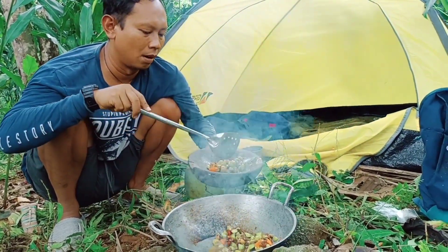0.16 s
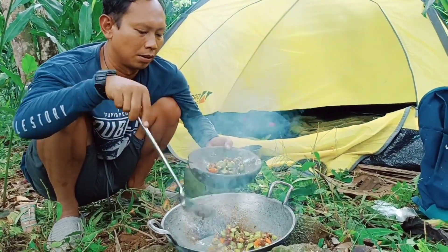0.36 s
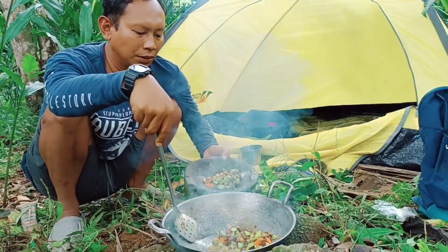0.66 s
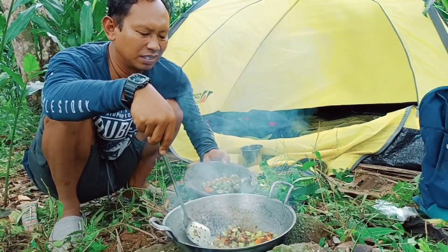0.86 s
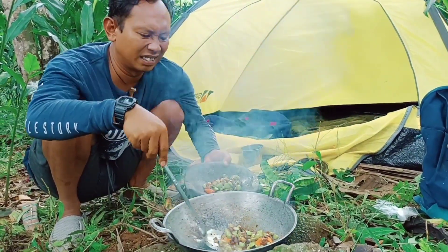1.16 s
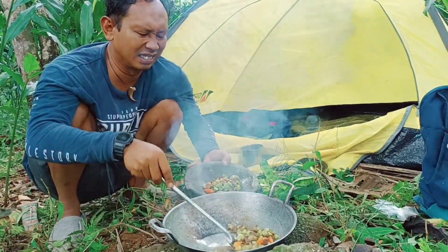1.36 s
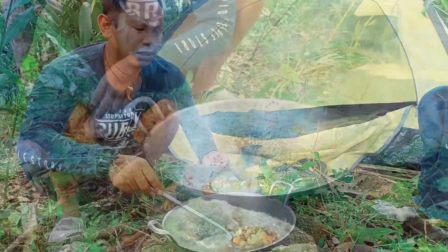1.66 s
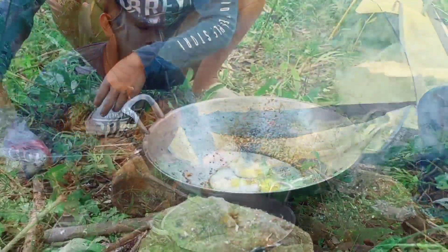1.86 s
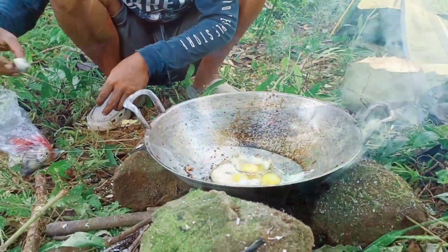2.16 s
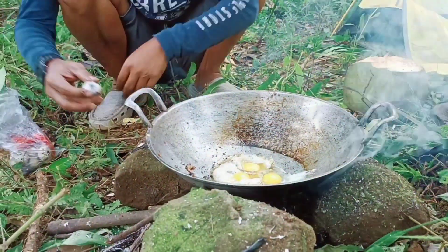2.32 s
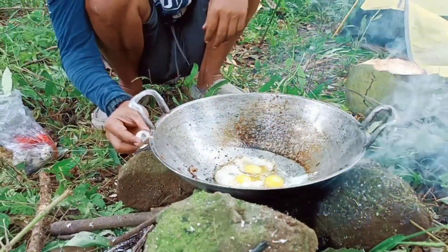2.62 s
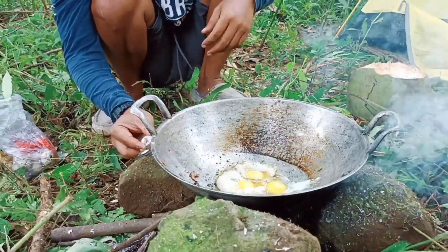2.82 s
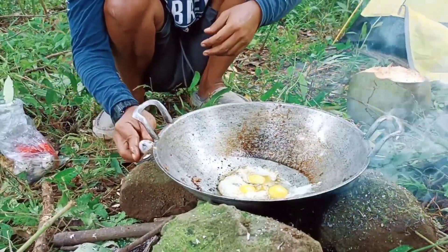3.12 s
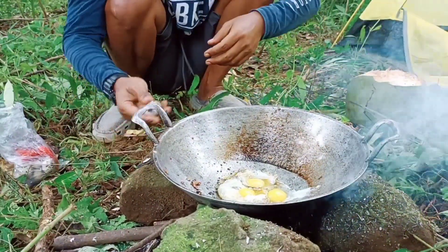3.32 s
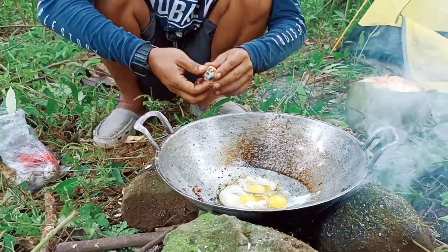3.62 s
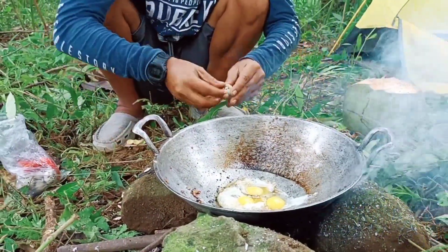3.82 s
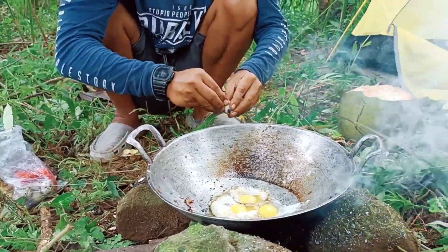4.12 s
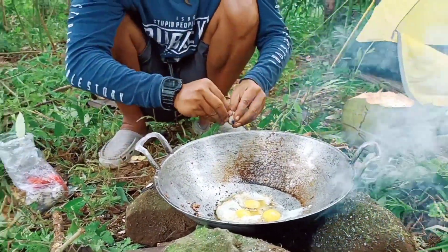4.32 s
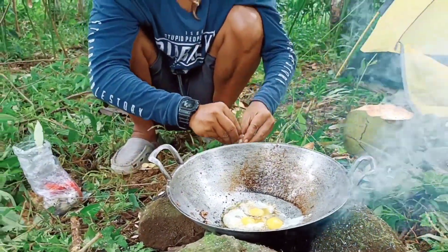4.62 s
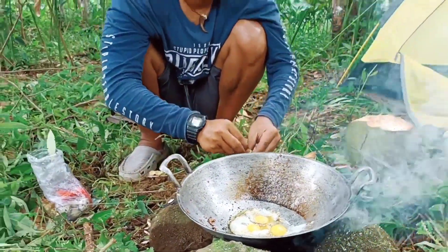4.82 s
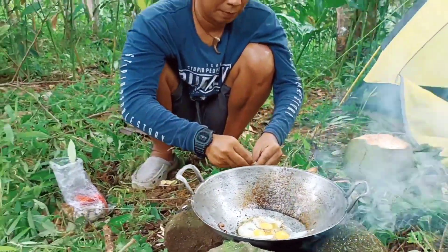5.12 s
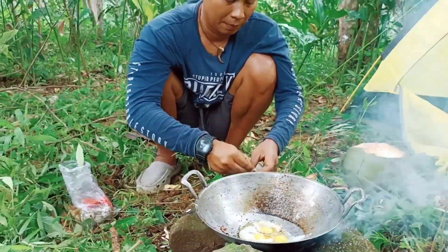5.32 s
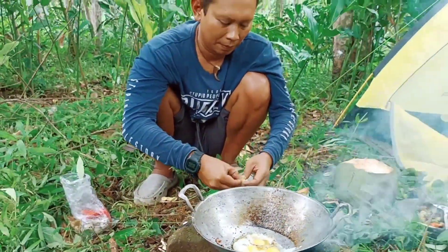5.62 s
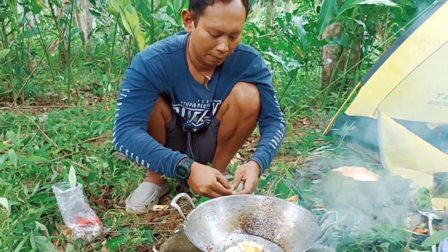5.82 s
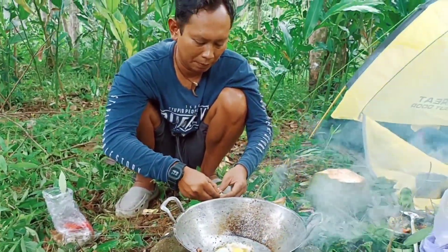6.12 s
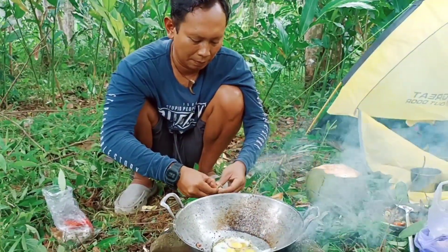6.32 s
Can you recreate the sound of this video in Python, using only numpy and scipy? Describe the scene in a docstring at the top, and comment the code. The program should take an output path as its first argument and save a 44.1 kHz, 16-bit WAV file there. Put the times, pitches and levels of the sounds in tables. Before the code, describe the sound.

In a leafy forest clearing, a spatula rattles brightly against a wok and drags in short gritty strokes within the first second and a half. The sound then changes to a fluttering, low-pitched wood fire under spitting eggs, with little taps and scattered snaps. Cicadas waver behind, and a bird sings two runs of climbing whistles with woodland echoes. Mono, close and detailed, ending on a loud crack.

```python
"""A metal spatula clanks into a wok and scrapes: ringing steel modes, contact noise and stick-slip crackle.
Oil sizzles as dense random bursts and spits as short swelling noise droplets.
Under the wok a wood fire roars, puffs at low pitch, snaps and knocks; an egg taps the wok's low modes.
Behind: two wavering bands of cicada buzz, a bird's whistled rising notes with forest echoes, a faint rumble."""
import sys
import numpy as np
from scipy import signal
from scipy.fft import rfft, irfft, next_fast_len
from scipy.io import wavfile
from scipy.ndimage import map_coordinates

SR = 44100
rng = np.random.default_rng(int(sys.argv[2]) if len(sys.argv) > 2 else 0)


def master(y):
    """Save y as 16-bit WAV."""
    cut = np.clip(np.atleast_2d(y).T, -1, 1)
    pcm = np.round(cut * 32767)  # scale
    wavfile.write(sys.argv[1], SR, pcm.astype(np.int16))


N = 285327

# Levels in dB are before the trims in each function. Spectra give relative dB per Hz.
# Rumble of air at the microphone: time_s, level_db
BREEZE_LEVEL = [(0, -66), (1.6, -61), (2.3, -68), (5.5, -65), (6.47, -61)]
# Cicadas: time_s, low_band_db, high_band_db
CICADA_LEVELS = [(0, -60, -52.5), (.6, -51.5, -66), (1.1, -53, -60), (1.45, -56, -49), (2.2, -75, -62),
                 (3.3, -55.5, -76), (3.9, -64, -57), (4.7, -60, -82), (6.47, -61, -58)]
# Runs of rising notes: first_s, last_s, gap_s, first_pitch_hz, climb_over_run_hz, level_db
SONG_RUNS = [(2.213, 3.171, .24, 2510, 469.4, -46), (4.996, 6.214, .245, 2437, 518, -42.5)]
# Held whistles: start_s, length_s, pitch_hz, scoop_from_below_hz, level_db
HELD_WHISTLES = [(1.391, 0.29, 2945, 380, -41.5), (1.695, 0.088, 2964, 27, -37),
                 (1.78, .22, 2690, 8.5, -50.5), (1.9, 0.099, 2990, 24, -47), (3.27, 0.2, 2345, 10, -61),
                 (3.639, 0.21, 2950, 70, -59), (3.818, 0.16, 2720, 24, -54.5)]
# Steady fire roar: time_s, level_db
FIRE_LEVEL = [(0, -56), (1, -53), (1.7, -58), (2.2, -52.5), (2.8, -47.5), (3.4, -45.5), (4.1, -48),
              (5.5, -51.5), (5.85, -46.5), (6.47, -50)]
# Roar spectrum: freq_hz, relative_db
ROAR_SPECTRUM = [(60, -26), (85, 7), (120, 9), (150, 9.5), (210, 1), (300, -6.5), (500, -46), (800, -56)]
# Spells of even, low puffing: first_s, last_s, gap_s, first_db, last_db
PUFF_SPELLS = [(1.868, 2.463, .119, -45, -33), (2.567, 2.684, .059, -33, -34),
               (2.805, 3.053, .124, -29.5, -34), (3.118, 3.692, .064, -29, -30.5),
               (3.819, 4.327, .127, -31.5, -30), (4.385, 4.747, .072, -33, -34.5),
               (4.821, 5.125, .076, -32, -33), (5.194, 5.494, .1, -36, -45),
               (5.595, 5.855, .087, -35, -31.5), (5.931, 6.47, .077, -31, -31.5)]
# Sharp snaps of wood, oil and steel: start_s, level_db, body_re_crack_db, crack_tilt_db_per_octave
SNAP_EVENTS = [(0.2221, -11, -16.5, 7), (.598, -27.5, -6, 5), (.857, -6, -7, -7), (2.742, -21.5, -10, -1),
               (2.757, -24, -22, 3), (3.002, -32.5, -0.5, 10), (3.112, -30.5, -22, 6),
               (3.993, -25.5, -17, 1), (4.297, -32, -24, 9), (5.7015, -16, -27, -1), (5.946, -28.5, -3, 2),
               (6.129, -26.5, -22, 9), (6.3436, -7.5, -3.5, 0)]
# Crack spectrum before tilt: freq_hz, relative_db
CRACK_SPECTRUM = [(1500, -30), (3500, -13), (5700, -16), (7800, -18.5), (9400, 0.5), (10500, -10.5),
                  (12500, -19), (15400, -31), (16500, -35)]
# Snap body spectrum: freq_hz, relative_db
BODY_SPECTRUM = [(40, -75), (100, -54), (220, 1), (400, 11), (650, -8), (1100, -9), (1900, 3.5),
                 (3000, -12.5), (5000, -58), (8000, -44)]
# Dull knocks of sticks and shell: time_s, level_db, resonance_hz
KNOCK_EVENTS = [(2.022, -40, 503), (2.083, -38, 557), (2.181, -41.5, 1000), (2.601, -23.5, 1600),
                (2.737, -34, 1930), (5.194, -38, 804), (5.888, -32, 2180), (6.299, -29, 2400),
                (6.3215, -13.5, 1700), (6.3534, -16.5, 2020)]
# Soft egg chatter on the rim: first_s, last_s, gap_s, first_db, last_db
EGG_CHATTERS = [(2.51, 2.58, .035, -42, -48.5), (2.753, 2.85, .032, -45, -35),
                (3.028, 3.143, .038, -29.5, -41.5)]
# Low wok modes under a soft touch: mode_hz, relative_db, t60_s
LOW_MODES = [(400.5, -3, 0.15), (518.6, 4.5, 0.17), (556.6, 3.5, 0.15), (741, -2.5, 0.15),
             (788, -2.5, 0.15), (876, -15, 0.29), (1059, -4, 0.21), (1296, -11, 0.29)]
# Frying: time_s, simmer_db, fizz_db
FRYING_LEVELS = [(0, -51.5, -48.5), (.4, -55, -50.5), (1.25, -56, -44.5), (2.2, -56, -59),
                 (3.2, -53.5, -55.5), (4.55, -51.5, -55.5), (4.85, -53.5, -57.5), (6.15, -55, -57.5),
                 (6.47, -42, -51)]
# Simmer spectrum: freq_hz, relative_db
SIMMER_SPECTRUM = [(180, -18), (300, 2), (785, -2), (864, -5), (1080, 0.5), (1440, -2.5), (1770, -0.5),
                   (2290, -2), (2860, 0), (3140, -4.5), (5300, -12.5), (6600, -18.5), (8000, -20),
                   (10400, -13), (17600, -120)]
# Fine fizz spectrum: freq_hz, relative_db
FIZZ_SPECTRUM = [(3820, -11), (6500, -27), (6930, -38.5), (7640, -16), (8890, 2.5), (9690, 6),
                 (11000, -10.5), (11800, -8), (12800, -10), (14800, -13.5), (16000, -24)]
# Water flashing to steam in the oil: start_s, length_s, level_db
STEAM_FLARES = [(3.93, .08, -49.5), (4.175, 0.034, -39.5), (4.36, 0.4, -42), (4.44, .04, -45.5),
                (4.715, 0.024, -43)]
# Steam spectrum: freq_hz, relative_db
STEAM_SPECTRUM = [(150, -35), (350, -5.5), (600, 0.5), (1100, -5.5), (1800, -0.5), (2700, 1), (3500, -5.5),
                  (5000, -8), (7500, -15.5), (9500, -0.5), (12000, -9), (15500, -18), (17000, -40)]
# Loudest droplets bursting in the oil: start_s, peak_db, pitch_hz
LOUD_SPITS = [(1.588, -32, 4420), (2.279, -37.5, 3250), (2.552, -30, 6550), (2.866, -24, 3330),
              (2.898, -31.5, 4300), (3.166, -30.5, 5030), (3.249, -29, 3380), (3.262, -22.5, 3480),
              (3.328, -27.5, 9100), (3.405, -29, 9100), (3.642, -32, 6100), (3.679, -18.5, 3980),
              (4.083, -32.5, 4870), (4.272, -37.5, 3340), (4.365, -28, 3380), (5.071, -27.5, 9100),
              (5.16, -32, 6030), (5.311, -31.5, 5860)]
# Faint droplets: time_s, level_db
FAINT_SPIT_LEVEL = [(0, -48.5), (2.5, -45), (3.4, -43.5), (4.1, -42.5), (4.7, -50), (5.5, -53.5),
                    (6.47, -43.5)]
# Spatula blows: start_s, level_db, tilt_db_per_octave, base_t60_s
CLANK_BLOWS = [(.857, -17.5, 4.5, 0.2), (.872, -22.5, -7, 0.23), (.910, -19.5, -2.5, 0.092),
               (0.9401, -17.5, 0, 0.098)]
# Wok modes under a hard blow: mode_hz, relative_db, t60_ratio to the blow's base
WOK_MODES = [(424, -1.5, 1.2), (498, -2.5, 1), (545, 3.5, 1), (586, -6, .8), (690, -4, 1), (820, 4.5, 1),
             (908, -3, 1), (1090, 8, 1), (1250, -20, .8), (1400, -3, .7), (1544, 7.5, .8), (1630, -21, 1),
             (1706, 3.5, 1), (1880, -15, .6), (2100, -2, 1), (2240, -19, .8), (2470, -0.5, 1),
             (2465, -9, 1), (2730, 1.5, 2.2), (2830, -7, 2.1), (3090, -9, .8), (3210, 1.5, .9),
             (3310, -7, .8), (3720, -1.5, .9), (3736, -6.5, .8), (4300, -13, 1)]
# Contact noise spectrum before tilt: freq_hz, relative_db
CONTACT_SPECTRUM = [(88, -61), (150, -29), (534, -3), (624, -6), (1060, -8.5), (1260, -7.5), (1530, -5),
                    (3220, -15), (3490, -38), (3770, -14), (5910, -34.5), (9440, -31), (16000, -73)]
# Spatula pushed over the steel: start_s, length_s, scrape_db, groan_db
SCRAPE_STROKES = [(0.578, 0.24, -48.5, -64), (1.081, 0.025, -45, -45), (1.119, 0.16, -40, -61),
                  (1.276, 0.064, -32.5, -53.5), (1.316, 0.016, -40, -62), (1.368, 0.031, -35, -51),
                  (1.406, 0.022, -62, -46.5)]
# Scrape spectrum: freq_hz, relative_db
SCRAPE_SPECTRUM = [(300, -11), (420, -10), (520, -4), (850, 4), (1200, -6), (1900, -1), (2700, -0.5),
                   (3400, -3.5), (4250, 1), (5500, -10), (7000, -12), (9500, 6.5), (12500, -8.5),
                   (16000, -24)]

TOP_HZ = 15700
NOTE_S, NOTE_RISE_HZ, CLIMB_POWER = .115, 308.8, 1.6
SONG_ARCH_DB, SONG_FADE_DB = 3, 0.5  # dip at both ends of a run; extra drop by its end
SCOOP_S = 0.054  # time constant
PUFF_HALF_S = 0.013  # median half-length
FLARE_ATTACK_S, FLARE_T60_S = 0.031, 0.076
WET_FROM_S, WET_TO_S = 2.4, 5.45  # lesser spits while the eggs are wet
LESSER_DB, LESSER_SPREAD_DB, LESSER_LOW_HZ, LESSER_HIGH_HZ = -31.5, 9, 3400, 9200
SPIT_LIFE_S, SPIT_WIDTH_RATIO = 0.0031, .12  # time to swell; bandwidth / pitch
SPRAY_S = .014  # longest spray delay
STROKE_ATTACK_S, STROKE_T60_S = 0.023, 0.13


def amp(db):
    """Decibels to gain."""
    return 10 ** (np.asarray(db) / 20)


def unit(x):
    """Scaled to rms 1."""
    return x / np.sqrt(np.mean(x ** 2) + 1e-20)


def seconds(length_s):
    """Time axis."""
    return np.arange(int(length_s * SR)) / SR


def fade(t, t60_s):
    """Exponential decay, 60 dB down after t60_s."""
    return np.exp(-np.log(1000) * t / t60_s)


def curves(rows):
    """One value per sample for each column after the time."""
    time_s, *columns = np.transpose(rows)
    return [np.interp(np.arange(N) / SR, time_s, column) for column in columns]


def wobble(rate_hz):
    """Smooth random curve, rate_hz knots a second."""
    knots = rng.standard_normal(int(N * rate_hz / SR) + 4)
    return map_coordinates(knots, [np.arange(N) * rate_hz / SR])


def filtered(x, response):
    """Spectrum of x times a response of frequency."""
    size = next_fast_len(len(x) + 8192)
    return irfft(rfft(x, size) * response(np.fft.rfftfreq(size, 1 / SR)), size)[:len(x)]


def coloured(x, spectrum):
    """x shaped by (freq_hz, relative_db) points, at rms 1."""
    freq_hz, db = np.transpose(spectrum)
    return unit(filtered(x, lambda hz: amp(np.interp(np.log(hz + 1), np.log(freq_hz), db))))


def noise(spectrum, size=N):
    """Coloured noise of rms 1."""
    return coloured(rng.standard_normal(size), spectrum)


def band(centre_hz, half_width_hz, size=N):
    """Noise of rms 1 in one resonance."""
    white = rng.standard_normal(size)
    return unit(filtered(white, lambda hz: 1 / (1 + ((hz - centre_hz) / half_width_hz) ** 2)))


def tilted(spectrum, db_per_octave, pivot_hz=1):
    """Spectrum tilted about pivot_hz."""
    return [(hz, db + db_per_octave * np.log2(hz / pivot_hz)) for hz, db in spectrum]


def crackle(rate_hz, spread_db):
    """Random impulses, most weak and a few strong, at rms 1."""
    sizes = amp(spread_db * np.minimum(rng.exponential(size=N), 4))
    return unit((rng.random(N) < rate_hz / SR) * sizes * rng.choice([-1, 1], N))


def add(track, start_s, sound):
    """Mixes a sound into the track at start_s."""
    start = max(round(start_s * SR), 0)
    track[start:start + len(sound)] += sound[:max(N - start, 0)]


def echo(x, t60_s):
    """Diffuse reflections through a unit-energy noise tail that builds, then decays."""
    t = seconds(1)
    tail = rng.standard_normal(len(t)) * fade(t, t60_s) * (1 - fade(t, t60_s / 10))
    return signal.fftconvolve(x, tail / np.linalg.norm(tail))[:N]


def beats(spells):
    """The (start_s, level_db) of each beat in spells of even beating."""
    out = []
    for first_s, last_s, gap_s, first_db, last_db in spells:
        count = round(abs(last_s - first_s) / gap_s) + 1
        out.extend(np.linspace((first_s, first_db), (last_s, last_db), count))
    return out


def swells(rows, attack_s, t60_s):
    """Summed gain of (start_s, length_s, level_db) gestures that rise, hold and die away."""
    t = np.arange(N) / SR
    gain = np.zeros(N)
    for start_s, length_s, db in rows:
        rise = np.clip((t - start_s) / attack_s, 0, 1)
        gain += amp(db) * rise * fade(np.maximum(t - start_s - length_s, 0), t60_s)
    return gain


def ring(modes, t):
    """Decaying modes of nominal starting rms 1, with strengths and phases redrawn per strike."""
    hz, db, t60_s = np.transpose(modes)[:, :, None]
    gain = amp(db + rng.normal(0, 1.6, hz.shape))
    waves = gain * np.sin(2 * np.pi * (hz * t + rng.random(hz.shape))) * fade(t, t60_s)
    return waves.sum(axis=0) * np.sqrt(2 / np.sum(gain ** 2))


def breeze():
    """Air rumbles at the microphone: deep noise of slowly varying level."""
    rumble = noise([(15, -32), (30, -15.5), (50, 3), (75, -4.0), (130, -28), (300, -62)])
    return amp(curves(BREEZE_LEVEL)[0]) * rumble


def cicadas():
    """Two narrow noise bands of buzz, wavering in level."""
    low_db, high_db = curves(CICADA_LEVELS)
    low = amp(low_db - 4 + 2.7 * wobble(10)) * band(1818, 51)
    high = amp(high_db + 0.44 * wobble(5.7)) * band(2780, 170)
    return low + high


def note(pitch_hz, rasp):
    """Whistled sine that swells and fades along an unsteady pitch."""
    u = np.arange(len(pitch_hz)) / len(pitch_hz)
    unsteady = 1 + rasp * wobble(214.3)[:len(pitch_hz)]
    tone = np.sin(2 * np.pi * np.cumsum(pitch_hz * unsteady) / SR)
    return np.sqrt(2 * np.sin(np.pi * u)) * tone


def bird(direct_db=-5, trunks_db=-5, forest_db=-4, forest_t60_s=1.0, whistle_db=-3):
    """Held whistles and runs of raspy rising notes, each higher than the last, echoed by the trees."""
    runs, held = np.zeros(N), np.zeros(N)
    rise_hz = NOTE_RISE_HZ * np.sin(seconds(NOTE_S) / NOTE_S * np.pi / 2)
    for first_s, last_s, gap_s, first_hz, climb_hz, db in SONG_RUNS:
        for u in np.linspace(0, 1, round((last_s - first_s) / gap_s) + 1):
            pitch_hz = first_hz + climb_hz * u ** CLIMB_POWER + rise_hz
            note_db = db - SONG_ARCH_DB * (2 * u - 1) ** 2 - SONG_FADE_DB * u
            add(runs, first_s + u * (last_s - first_s), amp(note_db) * note(pitch_hz, rasp=0.014))
    runs = runs * amp(1.03 * wobble(70))
    for start_s, length_s, hz, scoop_hz, db in HELD_WHISTLES:
        pitch_hz = hz - scoop_hz * np.exp(-seconds(length_s) / SCOOP_S)
        add(held, start_s, amp(db + whistle_db) * note(pitch_hz, rasp=0.003))
    held = held * amp(2.0 * wobble(40.03))
    # near trunks answer quickly, the deep forest slowly
    calls = runs + .5 * held
    near = amp(trunks_db) * echo(calls, t60_s=0.4)
    far = amp(forest_db) * echo(calls, forest_t60_s)
    return held + amp(direct_db) * runs + near + far


def flames(pitch_hz=137, roar_db=1, puff_db=0.0, overtone=0.19, hollow_db=-13, cut_hz=78, scatter_db=0.7):
    """Each puff swings the air in the hearth for a few cycles, over a soft noise roar."""
    puffs, t = np.zeros(N), seconds(.16) - .08
    for start_s, db in beats(PUFF_SPELLS):
        phase = 2 * np.pi * (pitch_hz * (1 + 0.066 * rng.normal()) * t + rng.random())
        half_s = PUFF_HALF_S * np.exp(0.095 * rng.normal())
        main_swell = 2 ** (-2 * (t / half_s) ** 2)
        early_swell = 2 ** (-2 * ((t + 0.0063) / half_s) ** 2)
        # the overtone peaks early: the puff starts brighter than it ends
        puff = main_swell * np.sin(phase) + overtone * early_swell * np.sin(1.739 * phase)
        add(puffs, start_s + t[0], amp(db + puff_db + scatter_db * rng.normal()) * np.sqrt(2) * puff)
    puffs = puffs + amp(hollow_db) * echo(puffs, t60_s=0.24)
    # the puffs carry no deep bass
    puffs = filtered(puffs, lambda hz: 1 - 1 / (1 + (hz / cut_hz) ** 6))
    return puffs + amp(curves(FIRE_LEVEL)[0] + roar_db) * noise(ROAR_SPECTRUM)


def snaps(level_db=-5, crack_t60_s=0.01, tail_db=-17, tail_t60_s=0.18):
    """A hard crack and a duller body of noise, with a fast decay and a weak slower tail."""
    out, t = np.zeros(N), seconds(.2)
    decay = fade(t, crack_t60_s) + amp(tail_db) * fade(t, tail_t60_s)
    for start_s, db, body_db, tilt_db in SNAP_EVENTS:
        crack = noise(tilted(CRACK_SPECTRUM, tilt_db), size=len(t))
        burst = crack + amp(body_db) * noise(BODY_SPECTRUM, size=len(t))
        add(out, start_s, amp(db + level_db) * burst * decay)
    return out


def knocks(level_db=-7, t60_s=0.074, delay_s=0.00109):
    """Short woody knocks: decaying noise in one broad resonance."""
    out, t = np.zeros(N), seconds(.15)
    for time_s, db, hz in KNOCK_EVENTS:
        knock = band(hz, hz * .5, size=len(t)) * fade(t, t60_s)
        add(out, time_s + delay_s, amp(db + level_db) * knock)
    return out


def egg_taps(level_db=0, thud=0.5):
    """A soft contact rings only the wok's low modes, with a dull thud."""
    out, t = np.zeros(N), seconds(.4)
    for start_s, db in beats(EGG_CHATTERS):
        contact = thud * band(560, 540, size=len(t)) * fade(t, 0.085)
        soft_attack = 1 - fade(t, 0.003)
        add(out, start_s, amp(db + level_db) * (ring(LOW_MODES, t) + contact) * soft_attack)
    return out


def bubbles():
    """Tiny bursts over steady noise."""
    return rng.standard_normal(N) + .6 * crackle(rate_hz=2500, spread_db=3)


def frying(simmer_db=0, fizz_db=-1, flare_db=0):
    """Countless tiny bubbles burst in the oil; denser bursts flare as water flashes to steam."""
    simmer_curve_db, fizz_curve_db = curves(FRYING_LEVELS)
    simmer_gain = amp(simmer_curve_db + simmer_db + 2.7 * wobble(14))
    simmer = simmer_gain * coloured(bubbles(), SIMMER_SPECTRUM)
    fizz_gain = amp(fizz_curve_db + fizz_db + 0.9 * wobble(30) + 3.4 * wobble(220))
    fizz = fizz_gain * coloured(bubbles(), FIZZ_SPECTRUM)
    boil = crackle(rate_hz=5000, spread_db=4) + .5 * rng.standard_normal(N)
    steam = coloured(boil * amp(1.8 * wobble(70)), STEAM_SPECTRUM)
    return simmer + fizz + amp(flare_db) * swells(STEAM_FLARES, FLARE_ATTACK_S, FLARE_T60_S) * steam


def droplet(pitch_hz, life_s, width_ratio):
    """Noise burst around one pitch that swells and dies, at peak 1."""
    t = seconds(.03)
    hz = np.fft.rfftfreq(len(t), 1 / SR)
    resonance = 1 / (1 + np.abs((hz - pitch_hz) / (pitch_hz * width_ratio)) ** 3)
    burst = irfft(rfft(rng.standard_normal(len(t))) * resonance, len(t))
    burst = burst * (t / life_s) ** 2 * np.exp(-2 * t / life_s)
    return burst / np.abs(burst).max()


def lesser_spits(count=16):
    """Random (start_s, peak_db, pitch_hz) bursts, mostly high, spread over the wet time."""
    out = []
    for k, (when, size, pitch) in enumerate(rng.random((count, 3))):
        start_s = WET_FROM_S + (WET_TO_S - WET_FROM_S) * (k + when) / count
        pitch_hz = LESSER_HIGH_HZ - (LESSER_HIGH_HZ - LESSER_LOW_HZ) * pitch ** 3
        out.append((start_s, LESSER_DB - LESSER_SPREAD_DB * size, pitch_hz))
    return out


def spits(loud_db=-4, faint_db=0, spray_db=-15):
    """Each loud spit throws four smaller droplets; faint ones crackle throughout."""
    out = np.zeros(N)
    for start_s, db, hz in LOUD_SPITS + lesser_spits():
        add(out, start_s, amp(db + loud_db) * droplet(hz, SPIT_LIFE_S, SPIT_WIDTH_RATIO))
        for delay, pitch in rng.random((4, 2)):
            spray = droplet(5000 + 6000 * pitch, .0018, width_ratio=.1)
            add(out, start_s + SPRAY_S * delay ** 2, amp(db + spray_db) * spray)
    for when, size, pitch in rng.random((1300, 3)):
        start_s = when * N / SR
        # high droplets are the most common and the strongest
        db = np.interp(start_s, *np.transpose(FAINT_SPIT_LEVEL)) + 10 * size ** 6 - 10 * pitch
        pitch_hz = 10400 / 3.1 ** (pitch ** 3)
        add(out, start_s, amp(db + faint_db) * droplet(pitch_hz, .0017, width_ratio=.1))
    # the bowl scatters every burst
    return out + .45 * echo(out, t60_s=.06)


def spatula(ring_db=-1, clatter_db=-3, clatter_t60_s=0.14, scrape_db=-1):
    """The blade strikes the wok's modes, bounces, then slips and groans over the steel."""
    clanks, t = np.zeros(N), seconds(0.46)
    for start_s, db, tilt_db, t60_s in CLANK_BLOWS:
        modes = [(hz, level_db + tilt_db * np.log2(hz / 1500), ratio * t60_s)
                 for hz, level_db, ratio in WOK_MODES]
        contact = noise(tilted(CONTACT_SPECTRUM, tilt_db), size=len(t)) * fade(t, clatter_t60_s)
        add(clanks, start_s, amp(db) * (amp(ring_db) * ring(modes, t) + amp(clatter_db) * contact))
    pushes = [(start_s, length_s, db) for start_s, length_s, db, _ in SCRAPE_STROKES]
    presses = [(start_s, length_s, db) for start_s, length_s, _, db in SCRAPE_STROKES]
    push = swells(pushes, STROKE_ATTACK_S, STROKE_T60_S)
    press = swells(presses, STROKE_ATTACK_S, STROKE_T60_S)
    grit = coloured(crackle(rate_hz=3500, spread_db=3.5), SCRAPE_SPECTRUM)
    slips = push * amp(scrape_db + 1.6 * wobble(59.94)) * grit
    groan = press * unit(sum(amp(db) * band(hz, 27.0) for hz, db, _ in LOW_MODES))
    # each slip rings on briefly in the steel
    return clanks + groan + 0.7 * slips + 0.59 * echo(slips, t60_s=0.037)


def scene():
    """Forest, hearth and wok at one microphone."""
    forest = breeze() + cicadas() + bird()
    fire = flames() + snaps() + knocks()
    wok = egg_taps() + frying() + spits() + spatula()
    return (forest + fire + wok)[None]


def record(dry):
    """The microphone loses the deepest bass and everything from TOP_HZ up."""
    return filtered(dry[0], lambda hz: (hz < TOP_HZ) * (1 - 1 / (1 + (hz / 40) ** 4)))[None]


dry = scene()
out = record(dry)
master(out)
```